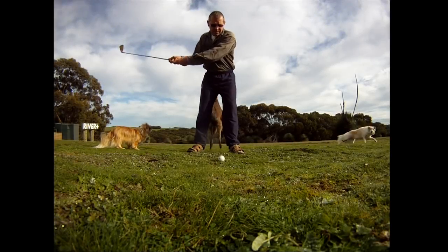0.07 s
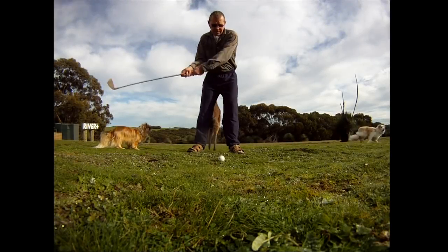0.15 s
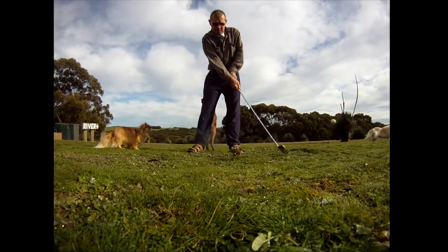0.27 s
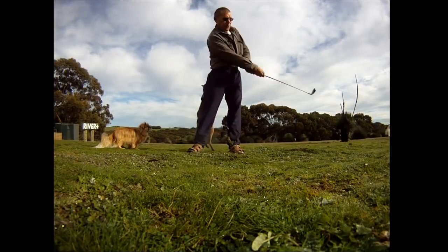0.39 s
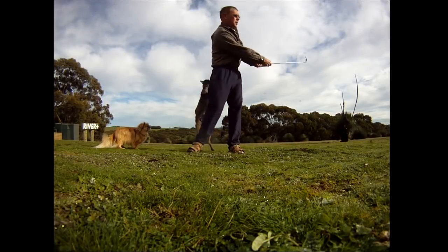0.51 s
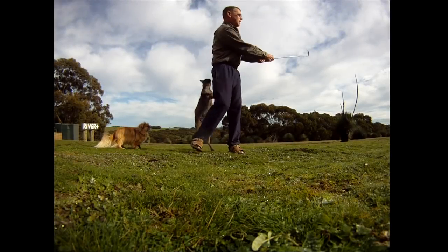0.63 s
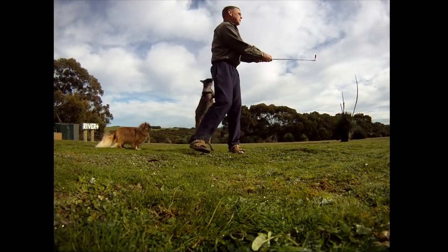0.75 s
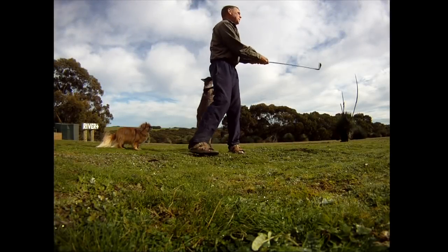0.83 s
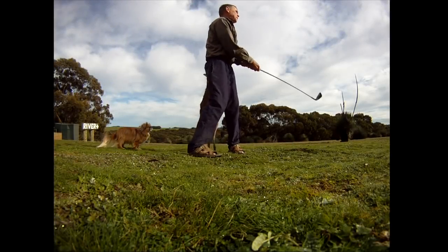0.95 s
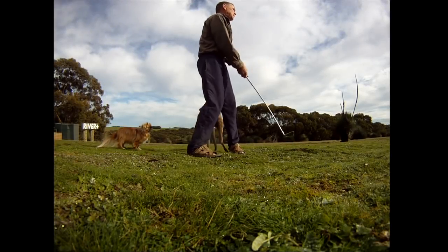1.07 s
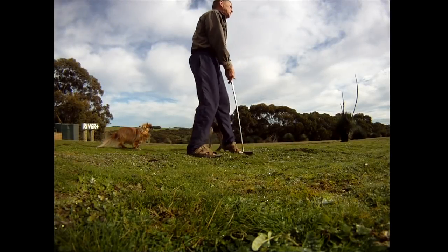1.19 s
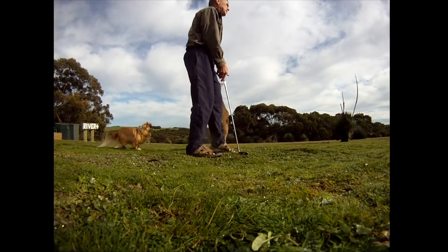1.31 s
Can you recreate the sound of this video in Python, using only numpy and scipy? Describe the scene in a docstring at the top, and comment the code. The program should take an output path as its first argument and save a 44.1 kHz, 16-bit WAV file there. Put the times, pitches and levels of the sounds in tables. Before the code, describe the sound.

A golf club cracks a ball off turf, then soft thuds follow on a breezy lawn

```python
"""On a lawn in a quiet breeze of coloured noise, an iron swings down, its shaft humming in the air.
It cracks a ball and thumps the turf: clicks, ringing modes, bursts of noise and a rising deep tone.
Soft thuds of damped modes, probably paws and feet on grass, mostly follow, with snaps and swishes of grass.
A small camera on the ground samples at 12 kHz and holds each value, which mirrors the sound faintly
into the treble."""
import sys
import numpy as np
from scipy import signal
from scipy.fft import rfft, irfft
from scipy.io import wavfile
from scipy.ndimage import uniform_filter1d

SR = 44100
rng = np.random.default_rng(int(sys.argv[2]) if len(sys.argv) > 2 else 0)


def volts_from_db(level):
    """Convert decibel levels to linear amplitude ratios."""
    exponent = np.asarray(level, float) / 20
    return 10 ** exponent


def pcm_store(signal):
    """Save signal as 16-bit PCM."""
    levels = np.round(np.clip(np.atleast_2d(signal), -1, 1) * 32767)
    wavfile.write(sys.argv[1], SR, levels.astype(np.int16).T)


N = 59535  # length in samples


def ring(hz, db, t60, rise_s=.00005):
    """One mode with a soft start, decaying 60 dB in t60 seconds."""
    t = np.arange(8000) / SR
    envelope = volts_from_db(db - 60 * t / t60) * (1 - np.exp(-t / rise_s))
    return envelope * np.sin(2 * np.pi * hz * t)


def add(mix, s, sound):
    """Mixes a sound in at time s."""
    part = mix[round(s * SR):][:len(sound)]
    part += sound[:len(part)]


def resonate(x, hz, width_hz):
    """A resonance of gain 1 that may follow a pitch curve."""
    # shift the pitch down to zero, smooth with a one-pole low-pass, shift back up
    turn = np.exp(2j * np.pi * np.cumsum(hz * np.ones(len(x))) / SR)
    r = np.exp(-np.pi * width_hz / SR)
    return 2 * (turn * signal.lfilter([1 - r], [1, -r], x / turn)).real


def evened(x):
    """Scales to rms 1."""
    return x / np.sqrt(np.mean(x ** 2) + 1e-20)


def click(db, width_s, rebound):
    """A short push and rebound; the push is centred three widths after the start."""
    u = np.arange(-3, 12, 1 / SR / width_s)  # time in widths
    push = np.exp(-u ** 2)
    return volts_from_db(db) * (push - rebound * np.exp(-((u - 2.2) / 1.3) ** 2))


def breeze():
    """Moving air as random short-time spectra under a falling colour, patchy in the bass."""
    # colour of the breeze: f/Hz, relative level per Hz/dB
    colour_points = [(15, -11), (35, 3), (70, 6), (150, -3.5), (300, -6), (550, -6.5), (760, -16),
                     (1200, -17.5), (2000, -21), (3000, -22), (4900, -25), (5900, -28.5)]
    level_db = -67.5  # rms
    lumps_db, lumps_below_hz = 4, 870  # patchiness at the bottom, and where it fades out
    frames, hz = N // 128 + 5, np.fft.rfftfreq(512, 1 / SR)
    a, b, patches = rng.standard_normal((frames, 257, 3)).T
    # smooth over 4 bins of frequency, then 8 frames of time
    patches = uniform_filter1d(uniform_filter1d(patches, size=4, axis=0), size=8, axis=1)
    depth_db = lumps_db / (1 + (hz / lumps_below_hz) ** 4)
    spectra = (a + 1j * b) * volts_from_db(depth_db[:, None] * evened(patches))
    white = signal.istft(spectra, nperseg=512, noverlap=384)[1][:N]
    f, db = np.transpose(colour_points)
    colour = volts_from_db(np.interp(np.log(np.fft.rfftfreq(N, 1 / SR) + 1), np.log(f + 1), db))
    return volts_from_db(level_db) * evened(irfft(rfft(white) * colour, N))


def swing():
    """The shaft sheds vortices at a pitch that follows its speed: a hum, a fuzz of air, a fuzzy octave."""
    # course of the swing: t/s, pitch f/Hz, level/dB before hum, fuzz and octave are balanced
    course = [(.07, 204.9, -88), (0.099, 218.5, -78), (0.149, 199.2, -79), (0.171, 212.6, -54.5),
              (0.177, 235.7, -53.5), (0.193, 284.7, -55.5), (0.206, 312, -57), (.212, 321, -38.5),
              (0.225, 338, -50), (0.227, 328, -73), (0.259, 174.7, -53), (0.269, 187, -50.5),
              (.293, 208.7, -58.5), (.304, 170, -79), (0.319, 174.2, -52.5)]
    fuzz_share, width_hz, octave_db = .22, 50, -19  # width of each fuzz resonance, doubled at the octave
    s, hz, db = np.transpose(course)
    t = np.arange(N) / SR
    pitch = np.interp(t, s, hz)

    def air(k):
        """Noise through two resonances at k times the pitch."""
        once = resonate(rng.standard_normal(N), k * pitch, k * width_hz)
        return evened(resonate(once, k * pitch, k * width_hz))

    fuzz, octave = air(1), air(2)
    hum = np.sqrt(2) * np.sin(2 * np.pi * np.cumsum(pitch) / SR)
    tone = (1 - fuzz_share) * hum + fuzz_share * fuzz + volts_from_db(octave_db) * octave
    return volts_from_db(np.interp(t, s, db, -120, -120)) * tone


def thuds():
    """Dull knocks: a few damped ground modes, tuned anew each time, swell up with a push just after their start."""
    # soft thuds on the ground: t/s, level/dB, nominal pitch f/Hz, nominal t60/s
    knocks = [(0.101, -65, 97, 0.22), (0.341, -57, 105, 0.16), (0.35, -51, 292, 0.062),
              (0.435, -54.5, 306, 0.052), (0.4402, -55.5, 400, .025), (0.454, -44.5, 244.6, 0.076),
              (.477, -53, 140, 0.062), (.5, -51, 288, 0.056), (0.517, -50, 97, 0.17),
              (0.5876, -45, 280, 0.024), (.592, -56.5, 176, 0.043), (0.599, -53, 128, 0.048),
              (.626, -58.5, 287, 0.048), (0.666, -60, 108.7, 0.084), (.689, -51.5, 288.6, .03),
              (0.703, -52.5, 111.6, 0.077), (0.709, -56.5, 254, 0.059), (.941, -53.5, 260, 0.026),
              (.972, -47.5, 239, 0.057), (1.09, -68, 258, 0.092), (1.126, -55.5, 125, 0.066),
              (1.205, -43, 305, .04), (1.217, -45.5, 182, 0.053), (1.243, -51.5, 205, 0.066),
              (1.276, -58.5, 60, 0.14)]
    # modes of each thud: pitch ratio [1], relative level/dB, share of t60 [1]
    partials = [(.42, -9, 1.3), (1., -1, 0.81), (1.9, -0.5, 0.56), (2.6, -8, .3)]
    push_db, push_turns = -3.5, .14  # relative level; width in cycles of the pitch
    rise_s = 0.0028
    out = np.zeros(N)
    chance = rng.standard_normal((len(knocks), len(partials)))
    for (s, db, hz, t60), row in zip(knocks, chance):
        add(out, s + 0.32 / hz, -click(db + push_db, push_turns / hz, 0.4))
        for (ratio, part_db, share), c in zip(partials, row):
            mode_hz = hz * ratio * (1 + 0.053 * c)
            add(out, s, ring(mode_hz, db + part_db, t60 * share, rise_s))
    return out


def contacts(ball_s):
    """Each contact clicks, rings the head and knocks the turf; noise bursts are timed from the ball hit."""
    # club head against grass, ball and turf: t/s, click level/dB, head ring level/dB, turf thump level/dB
    touches = [(.2276, -58, -48.5, -48.5), (.2323, -18, -22, -25.5), (.2347, -47, -32, -48),
               (.2365, -37, -48.5, -33), (.2405, -34.5, -39.5, -49)]
    # modes of club head and ball: f/Hz, relative level/dB, t60/s
    head_modes = [(1320, -18, 0.0067), (2325, -10.5, 0.019), (2630, -8.5, 0.033), (2869, -2.5, 0.017),
                  (3640, -17, 0.01), (4290, -32, 0.061), (4890, -32, 0.015)]
    # modes of the struck ground: f/Hz, relative level/dB, t60/s
    turf_modes = [(305, 0, .055), (512, -8, .075), (550, 0, .028), (775, -3, .028)]
    # bright crack in two grains, torn grass, falling turf:
    # delay after the ball hit/s, level/dB, t60/s, centre f/Hz, width of each of two resonances/Hz
    sprays = [(0.00037, -37.5, .006, 4600, 2800), (.0055, -48, .015, 5800, 2500),
              (0, -45, .035, 3100, 1800), (.017, -63, .08, 1900, 1200), (0.0042, -59, 0.26, 330, 1100)]
    click_s = 0.0001
    out = np.zeros(N)
    head = sum(ring(*m) for m in head_modes)
    turf = sum(ring(*m, rise_s=0.00097) for m in turf_modes)
    for s, click_db, head_db, turf_db in touches:
        add(out, s - 3 * click_s, click(click_db, click_s, 0.067))
        add(out, s, volts_from_db(head_db) * head - volts_from_db(turf_db) * turf)
    t = np.arange(8000) / SR
    for delay_s, db, t60, hz, width_hz in sprays:
        once = resonate(rng.standard_normal(len(t)), hz, width_hz)
        hiss = evened(resonate(once, hz, width_hz))
        add(out, ball_s + delay_s, hiss * volts_from_db(db - 60 * t / t60))
    return out


def deep_thump():
    """A thump through the ground that swells late and slides up in pitch."""
    start_s, level_db, rise_s, t60_s = .233, -33, 0.0058, .11
    start_hz, slide_hz_per_s = 105, 1600
    t = np.arange(8000) / SR
    turns = start_hz * t + .5 * slide_hz_per_s * t ** 2
    swell = (1 - np.exp(-t / rise_s)) * volts_from_db(level_db - 60 * t / t60_s)
    out = np.zeros(N)
    add(out, start_s, swell * np.sin(2 * np.pi * turns))
    return out


def grass():
    """Stems snap as a click with a short ring; swishes are resonant hiss that swells and fades."""
    # stems snapping: t/s, level/dB
    snaps = [(0.968, -65.5), (.987, -62), (1.004, -58), (1.031, -59), (1.043, -68), (1.206, -53.5),
             (1.221, -62)]
    # swishes: centre t/s, length between 1/e points/s, level/dB, centre f/Hz
    swishes = [(0.347, 0.1, -80, 2083), (0.874, 0.045, -79.5, 2580), (1.033, 0.21, -85, 2875),
               (1.213, 0.19, -81.5, 2500)]
    out, t = np.zeros(N), np.arange(N) / SR
    for s, db in snaps:
        add(out, s, click(db, 0.000094, 0.67))
        add(out, s, ring(2960, db - 2.5, 0.0087))
    for s, length, db, hz in swishes:
        hiss = evened(resonate(rng.standard_normal(N), hz, 1000))
        out += volts_from_db(db) * hiss * np.exp(-(2 * (t - s) / length) ** 2)
    return out


def scene():
    """All sources at the one microphone."""
    strike = contacts(ball_s=.2323) + deep_thump()
    return (breeze() + swing() + thuds() + strike + grass())[None]


def roll_off(x):
    """The treble ends steeply here."""
    return signal.sosfilt(signal.butter(12, 16290, fs=SR, output="sos"), x)


def record(dry):
    """Camera: low cut, low-pass, sampling that mirrors about its rate, hold with a sinc slope, band edge."""
    low_cut_hz, low_pass_hz, sample_hz, top_hz = 60, 5550, 12000, 15300
    hz = np.fft.rfftfreq(N, 1 / SR)
    low_cut = 1j * hz / (1j * hz + low_cut_hz)
    base = irfft(rfft(dry) * low_cut / np.sqrt(1 + (hz / low_pass_hz) ** 36), N)
    # sampling adds copies of the band on both sides of the sample rate
    sampled = base * (1 + 2 * np.cos(2 * np.pi * sample_hz * np.arange(N) / SR))
    hold = np.sinc(hz / sample_hz)
    held = irfft(rfft(sampled) * hold / (1 + (hz / top_hz) ** 60), N)
    return roll_off(held)


dry = scene()
out = record(dry)
pcm_store(out)
```